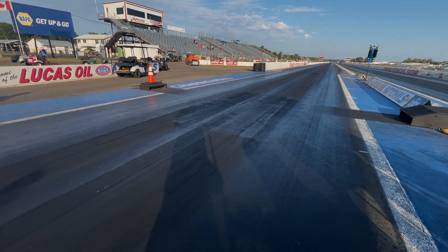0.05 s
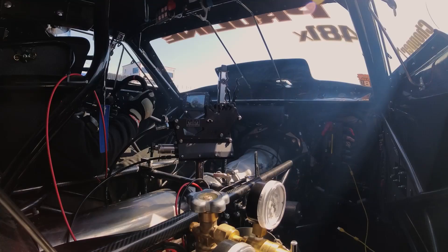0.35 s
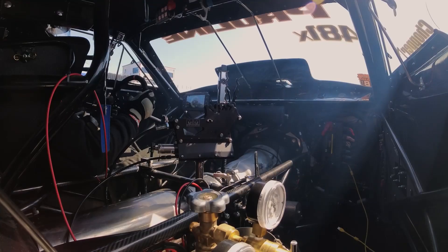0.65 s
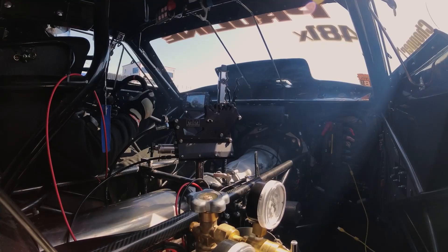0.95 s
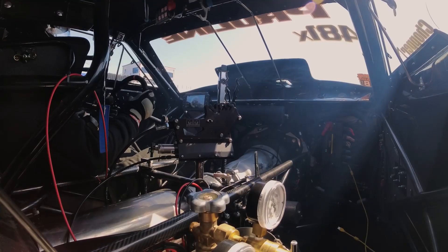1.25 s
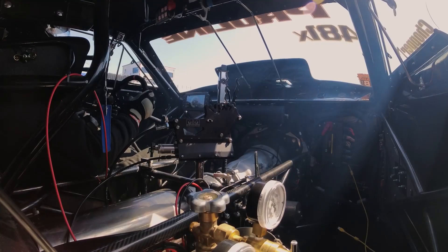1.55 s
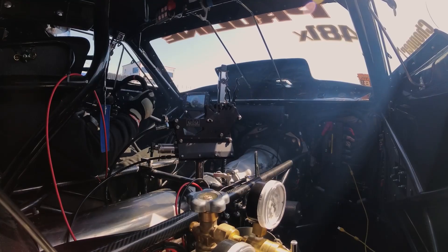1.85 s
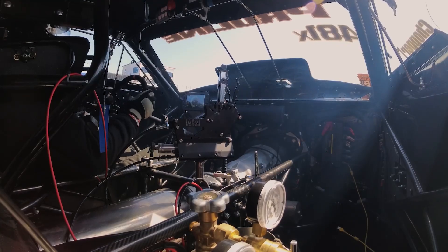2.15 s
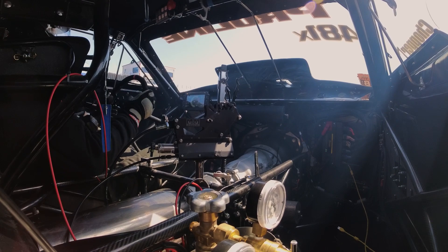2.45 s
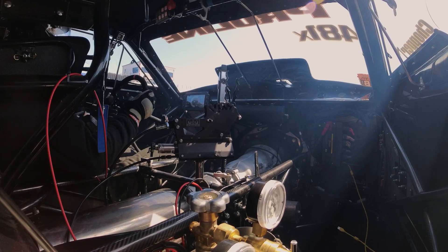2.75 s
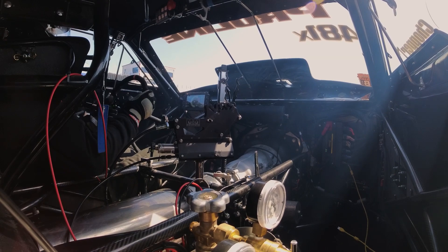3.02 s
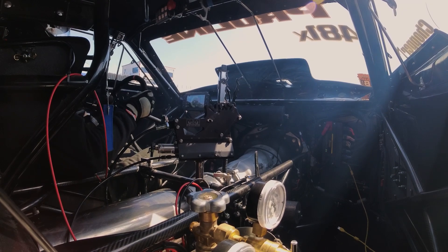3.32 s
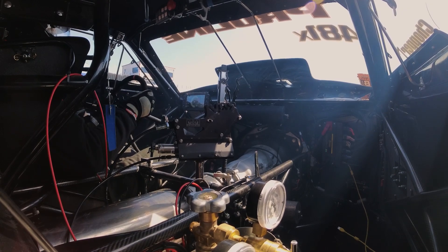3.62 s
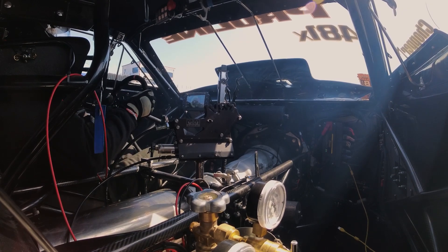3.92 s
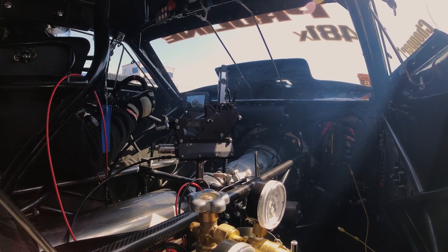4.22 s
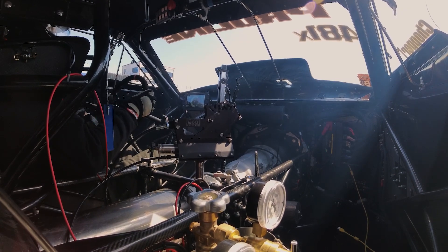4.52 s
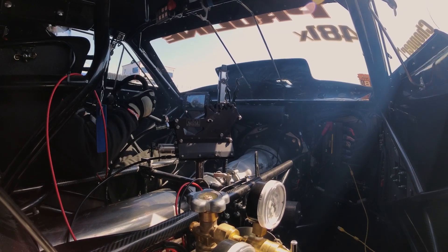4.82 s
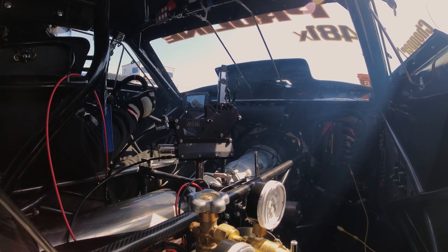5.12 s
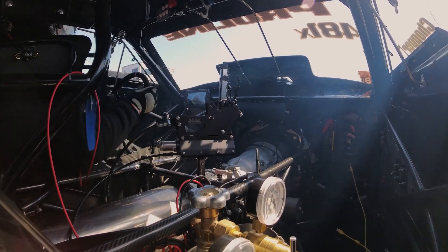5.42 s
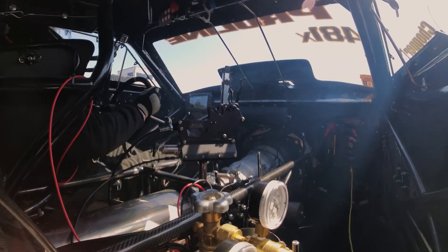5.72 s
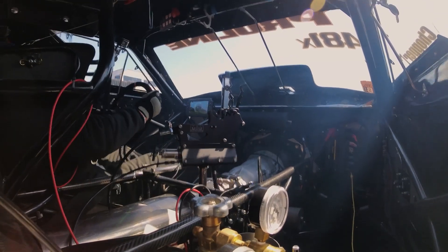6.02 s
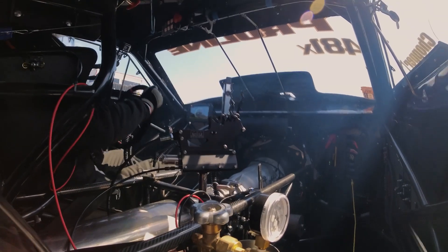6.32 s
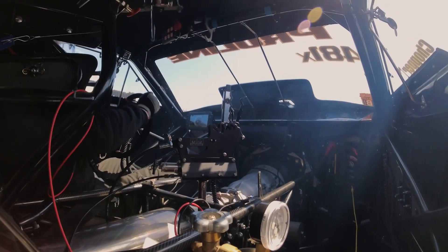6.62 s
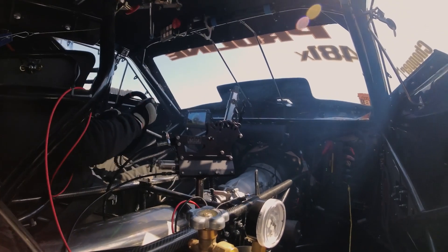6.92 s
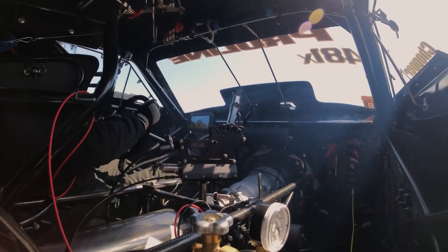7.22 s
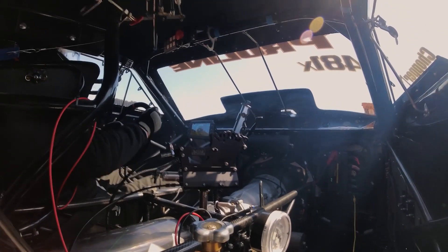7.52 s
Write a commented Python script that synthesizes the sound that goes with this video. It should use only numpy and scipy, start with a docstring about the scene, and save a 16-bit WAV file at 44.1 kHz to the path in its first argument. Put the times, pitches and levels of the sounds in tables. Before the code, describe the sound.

Inside a bare metal race car cabin, a booming V8 idle rattles the panels, then the revs jump, hold and climb to a hard roar.

```python
"""Inside the bare metal cabin of a supercharged V8 drag car, heard from the roll cage, close to eight open
exhaust stacks. The engine idles with a surge: the cabin booms at the firing rate, panels clatter, a loose
fitting tinks and rich charges bark in the pipes. The revs lift to a hold, lift again to a hard, crackling
roar of exhaust partials, ringing pipes and turbulent gas, and climb a little more. The camera that carries
the two microphones rounds off the peaks."""
import sys
import numpy as np
from scipy import signal
from scipy.fft import rfft, irfft
from scipy.io import wavfile
from scipy.ndimage import uniform_filter1d

SR = 44100
rng = np.random.default_rng(int(sys.argv[2]) if len(sys.argv) > 2 else 0)


def persist_wave(psi):
    """Save psi, clipped to +-1, as 16-bit WAV."""
    counts = np.round(np.clip(psi, -1, 1) * 32767).astype(np.int16)
    wavfile.write(sys.argv[1], SR, np.atleast_2d(counts).T)


N = 333396
T = np.arange(N) / SR
FREQ = np.fft.rfftfreq(N, 1 / SR)
LIFT_S = 4.52  # the throttle opens and the idle ends
SETTLE_S, SETTLED_THUD_DB = 3.3, -2  # the idle settles and the thuds soften


def undb(db):
    """Decibels to gain."""
    return 10 ** (np.asarray(db) / 20)


def curve(rows, column=1):
    """One column of a time table, sample by sample."""
    rows = np.array(rows)
    return np.interp(T, rows[:, 0], rows[:, column])


def steady(x, span_s=0.22):
    """Hold the running rms at 1."""
    power = np.mean(np.atleast_2d(x) ** 2, axis=0)
    return x / np.sqrt(uniform_filter1d(power, int(span_s * SR)) + 1e-12)


def shape(points):
    """Gain per frequency from points of f/Hz, level/dB."""
    hz, db = np.transpose(points)
    return undb(np.interp(np.log(FREQ + 1), np.log(hz), db))


def modes(rows):
    """Response of resonances (f/Hz, width/Hz, level/dB), with alternating signs."""
    f = FREQ + 1e-3
    return sum((-1) ** k * undb(db) / (1 + 1j * (f * f - hz * hz) / (f * width))
               for k, (hz, width, db) in enumerate(rows))


def colour(x, response):
    """Filter by a frequency response."""
    return irfft(rfft(x) * response, N)


def walk(rate_hz):
    """Smooth random drift with a spread near 1."""
    hold = int(SR / rate_hz)
    steps = np.repeat(rng.standard_normal(N // hold + 1), hold)
    return 1.3 * uniform_filter1d(uniform_filter1d(steps, hold), hold)[:N]


def kicks(times, sizes):
    """A single impulse at each time."""
    return np.bincount(np.clip(np.asarray(times) * SR, 0, N - 1).astype(int), sizes, N)


def bursts(times, sizes, decay_s):
    """An envelope that jumps at each time and dies away."""
    return signal.lfilter([1], [1, -np.exp(-1 / (decay_s * SR))], kicks(times, sizes))


# Stereo width at the roll cage: f/Hz, side minus mid level/dB
STEREO_WIDTH = [(60, -1), (130, -21.5), (350, -13), (700, -10), (1400, -3.5), (2800, 0), (8000, 0)]

def mic_pair(pair, response):
    """Two unrelated signals, filtered, become left and right: alike in the low mids, apart up high."""
    width = shape(STEREO_WIDTH)
    mid, side = rfft(pair) * response / np.sqrt(1 + width ** 2)
    return irfft(np.array([mid + width * side, mid - width * side]), N)


# Engine cycle rate (eight firings a cycle), idling and on the throttle: t/s, f/Hz
IDLE_RATE = [(.25, 14.01), (1.25, 14.13), (1.75, 14.07), (2.75, 14.3), (3.25, 14.08), (3.75, 14.13),
             (4.25, 14.29)]
THROTTLE_RATE = [(4.62, 17), (4.72, 19.6), (4.8, 23.6), (4.9, 33.1), (4.96, 33.69), (5.28, 34.65),
                 (5.42, 34.13), (5.46, 36.5), (5.53, 45), (5.63, 55.6), (5.71, 60.6), (5.74, 62),
                 (5.92, 60.2), (6.03, 62.8), (6.08, 62.4), (6.23, 63.1), (6.39, 61.5), (6.51, 64),
                 (6.68, 63.2), (6.82, 65.9), (7.12, 70.7), (7.56, 72)]

def cycle_rate():
    """A drifting idle, then the revs glide by equal ratios from one speed to the next."""
    times, hz = np.transpose([*IDLE_RATE, (LIFT_S, IDLE_RATE[-1][1]), *THROTTLE_RATE])
    return np.exp(np.interp(T, times, np.log(hz)))


def firings(cycle):
    """Sample index and cylinder of every firing."""
    at = np.flatnonzero(np.diff(np.floor(8 * cycle))) + 1
    return at, np.arange(len(at)) % 8


def lope_times(cycle, shares):
    """When the given shares of each lope (two cycles) fall: one row per lope of the idle."""
    lopes = np.arange(int(cycle[int(LIFT_S * SR)] / 2) + 1)
    return np.interp(2 * (lopes[:, None] + np.array(shares)), cycle, T)


# Each stack as heard from the roll cage, in firing order: level/dB
STACK_LEVELS = [1, -5, -1.5, -5.5, -0.5, 0, -3, -2.5]

def stacks(at, cylinder, sizes, decay_s):
    """Each stack reaches the microphones by its own cluster of reflections in the bare metal cabin."""
    age = T[:2048]
    paths = rng.standard_normal((8, 2, len(age))) * np.exp(-age / decay_s)
    pulses = [np.bincount(at, sizes * (cylinder == k), N) * undb(STACK_LEVELS[k]) for k in range(8)]
    return sum(signal.oaconvolve(pulse[None], path, axes=1)[:, :N] for pulse, path in zip(pulses, paths))


# Loose metal in the cabin: t/s, ring level/dB, click level/dB
METAL_KNOCKS = [(2.062, -34, -26), (2.204, -26, -29), (2.37, -35, -35), (3.4, -26, -35), (3.543, -34, -34),
                (3.826, -36, -34), (4.065, -32, -30), (4.248, -34, -31), (4.386, -38, -28)]

def tinks(ring_hz=4450, width_hz=600, ring_decay_s=0.0089, click_decay_s=0.008):
    """The shaking knocks a loose fitting against metal: a bright click and a short ring."""
    times, ring_db, click_db = np.transpose(METAL_KNOCKS)
    bright = shape([(2000, -25), (5300, 0), (6200, -8), (7100, 3), (8800, -24.5)])
    ring = steady(colour(rng.standard_normal((2, N)), modes([(ring_hz, width_hz, 0)]) ** 2))
    click = steady(colour(rng.standard_normal((2, N)), bright))
    return (ring * bursts(times, undb(ring_db), ring_decay_s)
            + click * bursts(times, undb(click_db), click_decay_s))


# Resonances of the panels around the microphones: f/Hz, width/Hz, level/dB
PANEL_MODES = [(276.6, 27, 3), (353, 52, -1), (430.7, 30.2, 3), (573, 110, -10), (752, 60, -4.5),
               (914, 43, -11.5), (1213, 91, -17.5), (1685, 330, -26), (2600, 180, -25.5)]

def clatter(at, cylinder, level_db=-28, scatter_db=2.0, wander_db=2):
    """Idle firings shake the bare metal panels; each panel comes and goes by itself."""
    sizes = rng.choice([-1, 1], len(at)) * undb(scatter_db * rng.standard_normal(len(at)))
    knocks = stacks(at, cylinder, sizes, decay_s=0.01)
    rings = sum(mic_pair(knocks, modes([panel])) * undb(wander_db * walk(14)) * (-1) ** k
                for k, panel in enumerate(PANEL_MODES))
    return steady(rings, span_s=0.09) * undb(level_db)


def pops(barks, level_db=-1.7, spit_db=-2, spit_decay_s=0.0069):
    """Each late charge slaps the panels into a short pitched ring, with a spit of gas behind the slap."""
    times, _, thud_db = barks.T
    slap = kicks(times, undb(thud_db)) * np.array([[1], [0]])  # mid only
    spit = rng.standard_normal((2, N)) * bursts(times, undb(thud_db), spit_decay_s)
    spit /= np.sqrt(spit_decay_s * SR / 2)
    ring = modes(PANEL_MODES) * shape([(200, 0.32), (430, -1.2), (750, -1.5), (1500, -0.18)])
    ring *= np.sqrt(.008 * SR / np.mean(abs(ring) ** 2))  # the energy of 8 ms at unit rms
    return mic_pair(slap + undb(spit_db) * spit, ring) * undb(level_db)


def slump(cycle, ring_hz=79, width_hz=13, level_db=-21.5, share=.08, scatter_db=2):
    """Once a lope the late charges heave a low air mode of the cabin, so the boom seems to drop."""
    times = lope_times(cycle, [share])[:, 0]
    db = scatter_db * rng.standard_normal(len(times)) + SETTLED_THUD_DB * (times > SETTLE_S)
    shoves = kicks(times, undb(db) * (times < LIFT_S))
    heave = colour(shoves, modes([(ring_hz, width_hz, 0)]) ** 2)
    return heave / np.std(heave[T < LIFT_S]) * undb(level_db)


# The barks of every lope: share of the lope, crack level/dB, thud level/dB
BARK_RHYTHM = [(0, -29.5, -28), (.065, -30.5, -21), (.145, -35.5, -17.5), (.24, -26.5, -21.5),
               (.38, -31.5, -20.5), (.48, -32.5, -21.5), (0.571, -34, -23.5), (.69, -33.5, -21.5),
               (.77, -34, -22.5), (.965, -37, -18.5)]
# The hardest barks: t/s, crack level/dB, thud level/dB
BARK_ACCENTS = [(0.29, -25, -22.5), (0.573, -24.5, -19.5), (0.714, -26, -16.5), (0.865, -26, -18),
                (1.001, -22.5, -12), (1.21, -25.5, -15), (1.349, -18.5, -13.5), (1.493, -25.5, -16.5),
                (1.574, -27, -18.5), (1.635, -26, -17.5), (1.735, -22, -16), (1.778, -26, -18),
                (2.013, -27, -15), (2.416, -22.5, -18), (2.836, -23.5, -20.5), (3.115, -26, -15.5),
                (3.262, -21, -16.5), (3.965, -23, -18.5), (4.201, -24.5, -18), (4.681, -24, -19.5)]

def idle_barks(cycle, jitter_s=.0008, crack_scatter_db=1.8, thud_scatter_db=1.0):
    """Rich charges light late in the stacks. Gives rows of t/s, crack level/dB, thud level/dB."""
    share, crack_db, thud_db = np.transpose(BARK_RHYTHM)
    times = lope_times(cycle, share)
    chance = rng.standard_normal(times.shape + (3,))
    crack_db = crack_db + crack_scatter_db * chance[..., 1]
    thud_db = thud_db + SETTLED_THUD_DB * (times > SETTLE_S) + thud_scatter_db * chance[..., 2]
    times = times + jitter_s * chance[..., 0]
    beats = np.column_stack([times.ravel(), crack_db.ravel(), thud_db.ravel()])
    accents = np.array(BARK_ACCENTS)
    free = np.min(abs(beats[:, :1] - accents[:, 0]), axis=1) > .006  # accents oust beats within 6 ms
    return np.vstack([beats[free & (beats[:, 0] < LIFT_S)], accents])


# Spectra of the gas jets, idling and under load: f/Hz, level/dB
JET_IDLE = [(300, -21), (900, 6.5), (1400, 3.5), (1950, -1.5), (2600, 0.5), (3800, -4), (5200, -5.5),
            (6700, -9.5), (7700, -16.5), (8800, -39)]
JET_LOAD = [(300, -11), (900, -1.5), (1400, 5), (1950, 1.5), (2600, 5), (3800, 4), (5200, 2), (6700, -3),
            (7700, -12), (8800, -28)]
# How hard the engine pulls: t/s, exhaust level/dB, gas crackle level/dB, pipe rasp level/dB
PULL_LEVELS = [(4.6, -14, -37.5, -31), (4.69, -16.5, -37, -29.5), (4.77, -20, -37, -29.5),
               (4.85, -18, -36.5, -30), (4.97, -19.5, -37, -31), (5.22, -20.5, -38, -34),
               (5.29, -23, -39, -36.5), (5.36, -19, -34, -23), (5.41, -20, -37, -36),
               (5.53, -19, -32, -25.5), (5.66, -21.5, -32.5, -28), (5.75, -19.5, -30.5, -26.5),
               (5.96, -22, -28, -22), (6.05, -22, -32, -30.5), (6.25, -24, -29.5, -33),
               (6.32, -22, -29, -25), (6.55, -22.5, -27.5, -29.5), (6.8, -22, -29, -27),
               (6.87, -22.5, -29.5, -28.5), (7.1, -20, -28, -28), (7.5, -21.5, -28, -28.5)]

def gas(at, cylinder, load, barks, scatter_db=2, idle_db=-31.5, load_db=5.5, surge_db=0.5, rise_s=0.0043):
    """Every firing sends a shock front and a puff of turbulent gas out of its stack; barks crack on top."""
    sizes = undb(scatter_db * rng.standard_normal(len(at)))
    puffs = bursts(at / SR, sizes * undb(np.take(STACK_LEVELS, cylinder)), decay_s=0.0063)
    hiss = steady(rng.standard_normal((2, N)) * (puffs + 0.31))
    shocks = steady(stacks(at, cylinder, sizes, decay_s=0.025))
    jet = hiss + shocks
    idling = steady(mic_pair(jet, shape(JET_IDLE))) * undb(idle_db)
    pull_db = load_db + curve(PULL_LEVELS, column=2) + surge_db * walk(30)
    pulling = steady(mic_pair(jet, shape(JET_LOAD))) * undb(pull_db)
    times, crack_db, _ = barks.T
    sharp = shape(JET_IDLE) * shape([(1500, 0.5), (6000, 5.0)])  # a crack is brighter than the jet
    flare = uniform_filter1d(bursts(times, undb(crack_db), decay_s=0.012), int(rise_s * SR) + 1)
    cracks = steady(mic_pair(rng.standard_normal((2, N)), sharp)) * flare
    return np.sqrt(1 - load) * idling + np.sqrt(load) * pulling + cracks


# Cabin and pipe resonances, heard from inside: f/Hz, width/Hz, level/dB
CABIN_MODES = [(81, 8.1, 9), (144, 36.5, 1.5), (159, 4.5, 1), (196.5, 22.4, 8), (279.5, 23.5, 3),
               (356, 33.5, -2.5), (428.4, 32.6, 0), (604, 150, -12), (762, 65, -5.5), (899, 26, -11.5),
               (1180, 190, -15.5)]

def lope(at, cylinder, scatter=0.7, level_db=-25):
    """Lumpy idle firings ring the cabin."""
    sizes = (1 + scatter * rng.uniform(-1.7, 1.1, len(at))) / undb(np.take(STACK_LEVELS, cylinder) / 2)
    cabin = modes(CABIN_MODES) * shape([(25, -12.5), (60, 9)])
    ringing = mic_pair(stacks(at, cylinder, sizes, decay_s=0.012), cabin)
    return steady(steady(ringing, span_s=0.052)) * undb(level_db)


# The idle note in the cabin: multiple of the cycle rate, relative level/dB
IDLE_PARTIALS = [(4.5, -23), (5.5, -19), (7, -10.5), (7.5, -12), (8, -1), (9, -21), (9.5, -14), (11, -12),
                 (13, -13), (14, -19.5)]

def drone(cycle, waver_db=1.56, sag_db=-5, sag_share=0.1, sag_width=0.063):
    """The idle note repeats every second cycle and sags once in each lope, as the late charges go off."""
    tone = sum(undb(db + waver_db * walk(6)) * np.cos(2 * np.pi * (k * cycle + rng.random()))
               for k, db in IDLE_PARTIALS)
    from_sag = (cycle / 2 - sag_share + .5) % 1 - .5
    return steady(tone * undb(sag_db * np.exp(-(from_sag / sag_width) ** 2)))


# The note as the throttle first opens: multiple of the cycle rate, relative level/dB
BLIP_PARTIALS = [(1, -39), (2, -26), (3, -21), (4, -21), (5, 7), (6, -12), (7, -19), (8, -12), (9, -16),
                 (10, -20), (11, -7), (12, -26), (13, -13)]

def boom(cycle, hz, level_db=-12.5, fall_db_per_octave=5, blip_db=-0.5):
    """The cabin air booms with the low partials: the idle drone, then a rising blip that weakens."""
    opened = np.interp(hz, [15, 19], [0, 1])
    blip = undb(blip_db) * exhaust_note(cycle, hz, [BLIP_PARTIALS], stage=0, smear_rad=3.1)
    tone = np.sqrt(1 - opened) * drone(cycle) + np.sqrt(opened) * blip
    return tone * undb(level_db - fall_db_per_octave * np.log2(hz / hz[0]))


# Resonances of the stacks under load: f/Hz, width/Hz, level/dB
PIPE_MODES = [(763, 60, 4.5), (922, 77, -2.5), (1203, 36, -2.5)]

def rasp(at, cylinder, scatter=0.56):
    """Hard, unequal firings ring the pipes; the upper partials flare as they cross the resonances."""
    blasts = stacks(at, cylinder, 1 + scatter * rng.standard_normal(len(at)), decay_s=0.0063)
    pipes = modes(PIPE_MODES) * shape([(300, -20), (650, -2.5), (1800, 7), (3500, -8.5)])
    return steady(mic_pair(blasts, pipes), span_s=0.03) * undb(curve(PULL_LEVELS, column=3))


# Spectrum of the uneven burning: f/Hz, level/dB
ROAR_SPECTRUM = [(40, -44.5), (75, -4), (130, 0.5), (300, 4), (450, 4), (650, -4.5), (850, -13),
                 (1300, -11), (1900, -12.5), (3000, -51)]
# Its strength at each speed: cycle rate f/Hz, level/dB relative to the exhaust
ROAR_LEVELS = [(20, -2), (30, -3), (35, -7), (52, -9), (61, -5), (63.5, -4.5), (66, -10)]

def roar(at, cylinder, hz):
    """Under load no two firings are equal; the differences fill the gaps between the partials."""
    uneven = stacks(at, cylinder, rng.uniform(-0.72, 1, len(at)), decay_s=0.007)
    level_db = np.interp(hz, *np.transpose(ROAR_LEVELS))
    return steady(mic_pair(uneven, shape(ROAR_SPECTRUM)), span_s=0.044) * undb(level_db)


def throb(cycle, hz, depth_db=1.5, lag_cycles=0.12, clear_hz=64.5, clear_span_hz=1.2):
    """Until the engine clears, the rough noise swells once a cycle behind the nearest stack."""
    unclear = 1 - np.clip((hz - clear_hz) / clear_span_hz, 0, 1)
    return steady(undb(depth_db * unclear * np.cos(2 * np.pi * (cycle - lag_cycles))))


# Pressure dips from the stacks nearest the microphones: share of the cycle, level/dB
NEAR_DIPS = [(0, -2), (.19, -8), (0.354, -2.5), (.665, -6)]
# Their strength at high speed: t/s, level/dB
DIP_LEVELS = [(5.45, -23), (5.75, -16), (6.0, -15.5), (6.22, -14), (6.5, -15), (6.8, -15.5), (7.1, -23),
              (7.56, -23.5)]

def hammer(cycle, scatter_db=4.0, jitter_s=.00014, dip_s=0.00017):
    """At high speed the nearest stacks stand out: a few sharp pressure dips in each cycle."""
    share, db = np.transpose(NEAR_DIPS)
    dip_cycles = np.arange(int(cycle[-1]))[:, None] + share
    chance = rng.standard_normal(dip_cycles.shape + (2,))
    times = np.interp(dip_cycles, cycle, T) - 2 * dip_s + jitter_s * chance[..., 0]
    spikes = bursts(times.ravel(), undb(db + scatter_db * chance[..., 1]).ravel(), dip_s)
    rounding = np.e / (1 + 2j * np.pi * FREQ * dip_s)
    timbre = shape([(20, -41), (55, -2.5), (200, -2), (900, -5.0), (2000, 8.5), (8000, 1)])
    return -colour(spikes, rounding * timbre) * undb(curve(DIP_LEVELS))


def dip_phases(orders):
    """Phase of each partial in the train of pressure dips."""
    share, db = np.transpose(NEAR_DIPS)
    return np.angle(-np.exp(-2j * np.pi * np.outer(orders, share)) @ undb(db))


def exhaust_note(cycle, hz, tables, stage, smear_rad, flutter_rad=0, waver_db=2.5):
    """Eight firings repeat once a cycle; the partials shift weight as stage moves through the tables."""
    orders = np.arange(1, max(len(rows) for rows in tables) + 1)
    spectra = [np.interp(orders, *np.transpose(rows), right=-30) for rows in tables]
    spectra = np.array([db - 10 * np.log10(np.sum(undb(db) ** 2)) for db in spectra])  # equal power
    phases = dip_phases(orders) + np.cumsum(smear_rad * rng.standard_normal(len(orders)))
    pipe_hz, pipe_width_hz, pipe_db = 1222, 22, -6.5
    width, tone = shape(STEREO_WIDTH), np.zeros((2, N))
    for k, db, phase in zip(orders, spectra.T, phases):
        gain = undb(np.interp(stage, np.arange(len(db)), db) + waver_db * walk(12))
        # a partial dips as it passes a narrow pipe resonance
        gain *= undb(pipe_db / (1 + ((k * hz - pipe_hz) / pipe_width_hz) ** 2))
        angle = 2 * np.pi * k * cycle + phase
        if flutter_rad:  # hot gas in the pipes makes each partial waver by itself
            angle += flutter_rad * walk(45)
        # the left microphone hears each partial a little ahead
        mid, side = np.cos(angle), -np.interp(k * hz, FREQ, width) * np.sin(angle)
        tone += gain * np.array([mid + side, mid - side])
    return steady(tone)


# The open stacks at four rising speeds: multiple of the cycle rate, relative level/dB
HOLD_PARTIALS = [(1, -13), (2, -11.5), (3, 5.5), (4, -2), (5, 0.5), (6, -19.5), (7, -27), (8, -1.5),
                 (9, -8), (10, -0.5), (11, -5), (12, -13.5), (13, -0.5), (14, -28), (15, -18), (16, -32),
                 (17, -10), (18, -6), (19, -19), (20, -22), (21, -16), (22, -7), (23, -21), (24, -26.5),
                 (25, -25), (26, -23), (27, -19), (28, -28)]
SWEEP_PARTIALS = [(1, -18), (2, -10), (3, 2.5), (4, -18), (5, 4), (6, -6), (7, -13.5), (8, 3), (9, -4),
                  (10, -8), (11, -7), (12, -14), (13, -3.5), (15, -13.5), (18, -8.5), (22, -11), (26, -18)]
HIGH_PARTIALS = [(1, -4.5), (2, -8), (3, 3), (4, -24), (5, -6), (6, -5), (7, -9), (8, 0.5), (9, 3),
                 (10, -14), (11, -14.5), (12, -9), (13, -7), (14, -10), (15, -8), (16, -13), (17, -18),
                 (18, -8.5), (19, -21), (20, -5), (21, -25), (22, -25), (23, -13), (24, -11)]
TOP_PARTIALS = [(1, -2), (2, -14), (3, -4), (4, -11), (5, -6), (6, 2), (7, -11), (8, 2.5), (9, -11),
                (10, -16), (11, -4.5), (12, -9), (13, -8), (14, -3.5), (15, -14), (16, -7), (17, -18),
                (18, -7), (19, -14), (20, -19), (21, -21), (22, -22)]

def blare(cycle, hz, trim_db=-0.1, tear_db=1.5):
    """The hard note changes colour as the pipes tune in; charges of unequal strength tear it."""
    tables = [HOLD_PARTIALS, SWEEP_PARTIALS, HIGH_PARTIALS, TOP_PARTIALS]
    stage = np.interp(hz, [36, 42, 54, 60, 64, 67], [0, 1, 1, 2, 2, 3])
    tone = exhaust_note(cycle, hz, tables, stage, smear_rad=0.4, flutter_rad=0.24)
    return tone * undb(trim_db + tear_db * walk(220))


def steepen(x, hz, skew_per_hz=0.002):
    """Very loud pressure waves grow lopsided: the troughs sharpen into spikes."""
    treble = shape([(40, -48.0), (150, -15.0), (400, 1.0), (4000, 11.0), (9000, -32)])
    return x - skew_per_hz * hz * colour(x ** 2, treble)


def scene(wobble=.005):
    """The crank drives the engine layers; the lope gives way to the hard note as the load comes on."""
    hz = cycle_rate()
    cycle = np.cumsum(hz * (1 + wobble * walk(70))) / SR
    barks = idle_barks(cycle)
    at, cylinder = firings(cycle)
    load = np.clip((hz - 14.5) / 5, 0, 1)
    tuned = np.clip((hz - 21) / 5, 0, 1)  # 0: cabin boom, 1: the pipes' hard note
    hard_note = np.sqrt(tuned) * blare(cycle, hz)
    shaking = np.sqrt(1 - load) * (lope(at, cylinder) + clatter(at, cylinder))
    idle = np.sqrt(1 - tuned) * boom(cycle, hz) + slump(cycle) + pops(barks) + shaking
    swell = np.sqrt(load) * throb(cycle, hz)
    exhaust = steepen(hard_note + roar(at, cylinder, hz) * swell, hz) * undb(curve(PULL_LEVELS))
    pull = exhaust + rasp(at, cylinder) * swell + tuned * hammer(cycle)
    return idle + pull + gas(at, cylinder, load, barks) + tinks()


# Balance of the two microphones on the roll cage: f/Hz, left minus right level/dB
MIC_BALANCE = [(400, 1), (800, 0), (1500, 4), (2800, 1.5), (4800, -5.5), (8250, -11.5)]

def record(dry, drive_db=1.5, top_hz=8900):
    """The two microphones differ in colour; the camera rounds the peaks and cuts the top treble."""
    lean = shape(MIC_BALANCE)
    heard = colour(dry, np.array([lean, np.ones_like(lean)]) * np.sqrt(2 / (1 + lean ** 2)))
    rounded = np.tanh(undb(drive_db) * heard)
    return signal.sosfilt(signal.ellip(10, .2, 75, top_hz, fs=SR, output="sos"), rounded)


dry = scene()
out = record(dry)
persist_wave(out)
```